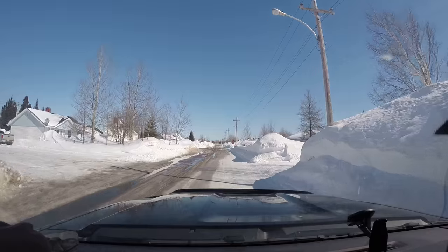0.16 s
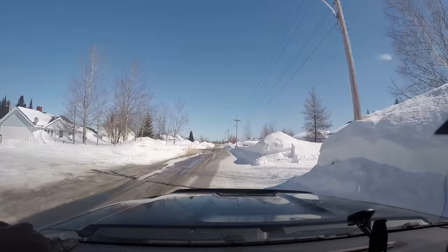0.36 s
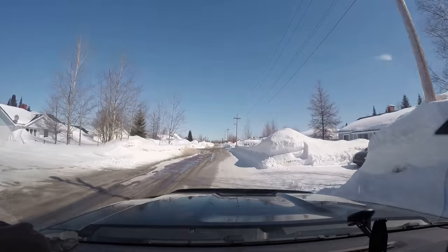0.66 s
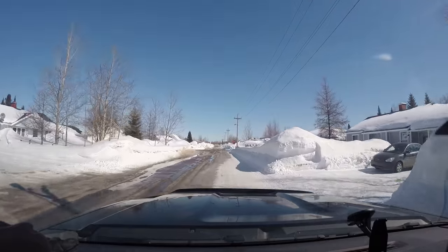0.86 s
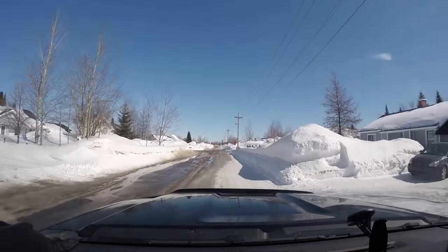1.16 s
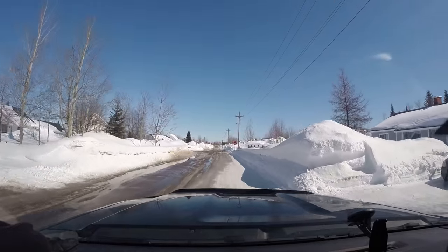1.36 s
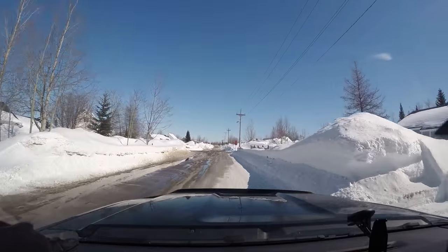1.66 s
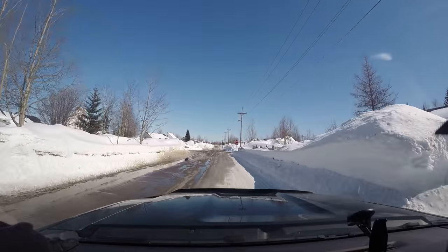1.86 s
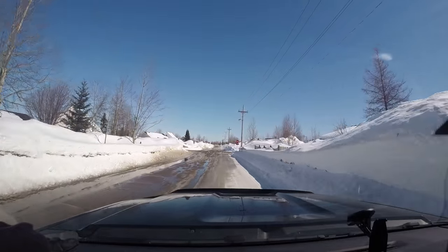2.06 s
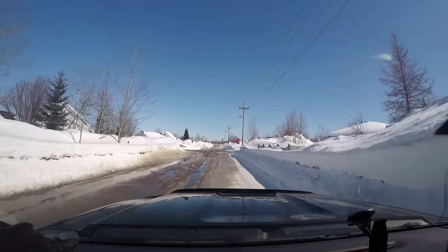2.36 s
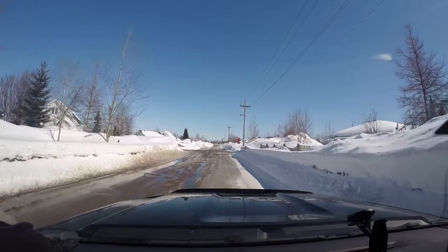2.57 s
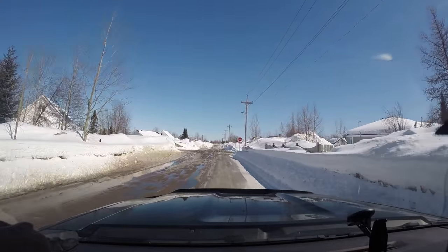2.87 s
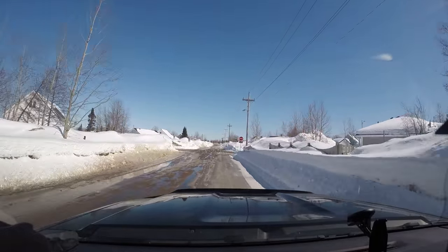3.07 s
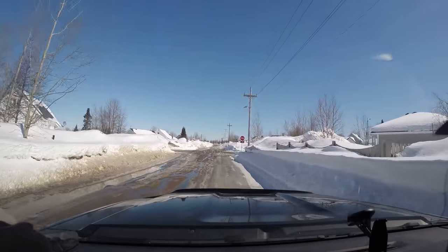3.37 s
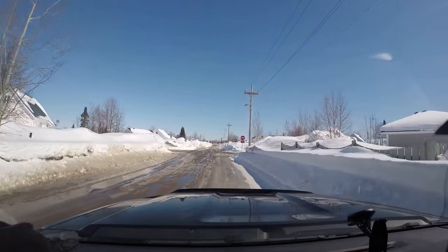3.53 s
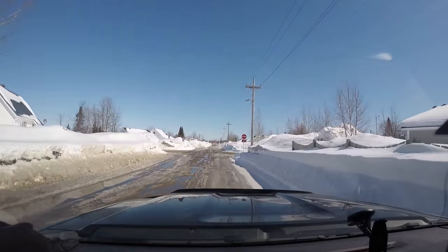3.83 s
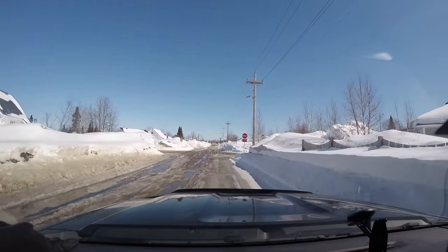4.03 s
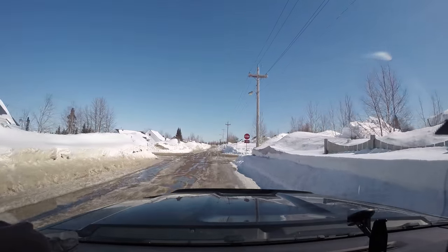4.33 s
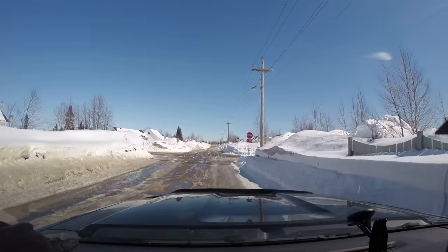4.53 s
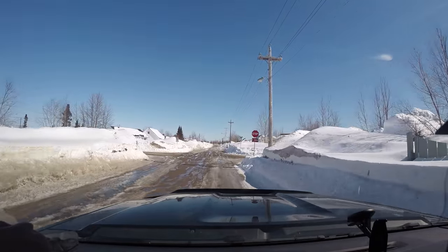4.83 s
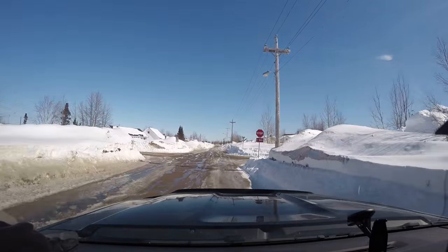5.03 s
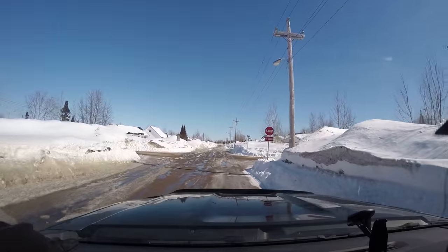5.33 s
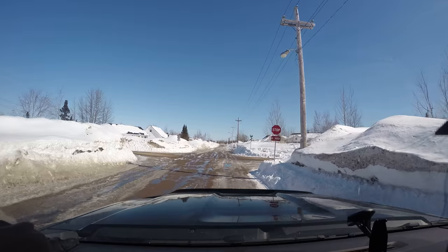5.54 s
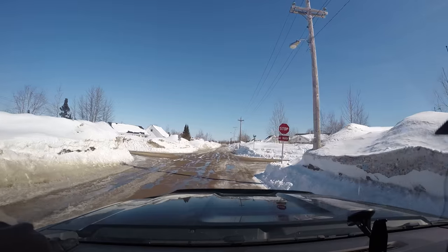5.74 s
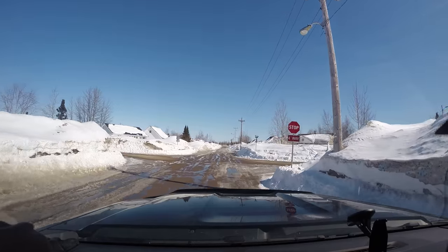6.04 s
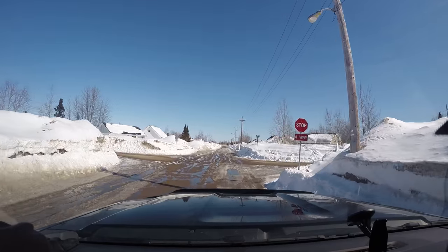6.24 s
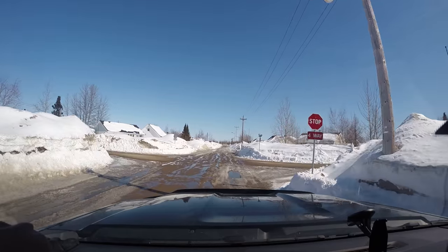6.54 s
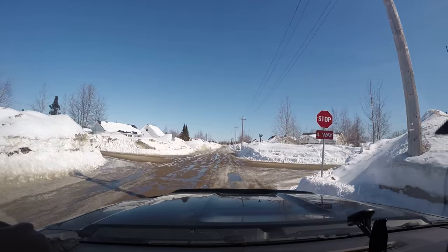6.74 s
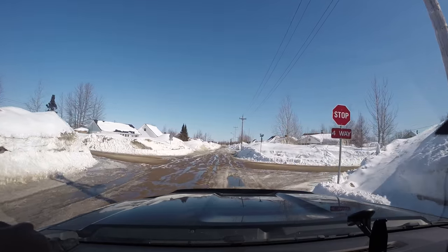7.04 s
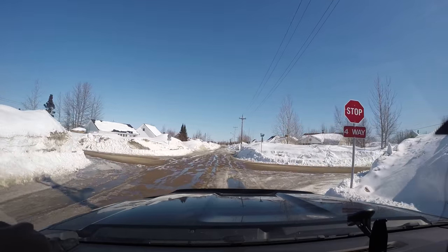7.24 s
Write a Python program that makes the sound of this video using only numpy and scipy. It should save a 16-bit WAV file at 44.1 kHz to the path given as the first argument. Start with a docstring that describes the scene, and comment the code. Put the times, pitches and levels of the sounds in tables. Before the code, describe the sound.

Inside a car rolling over a rutted, slushy road: deep uneven cabin boom and low rumble, faint braking rub, two late knocks, then quieter.

```python
"""Inside a car on a rutted, slushy road, braking to a stop sign, heard at one cabin microphone.
The cabin booms at its lowest air mode; coloured noise makes the body shake, tyre drone and hiss.
A wandering tone hums in the floor pan and resonant noise makes a faint rubbing hiss.
Trim ticks are short sine bursts; a loose part and the floor pan ring as struck decaying modes.
Short rough bursts, slush in the wheel arch and later the part's chatter, are filtered random grains."""
import sys
import numpy as np
from scipy import signal
from scipy.fft import rfft, irfft, next_fast_len
from scipy.io import wavfile
from scipy.ndimage import uniform_filter1d, map_coordinates

SR = 44100
rng = np.random.default_rng(int(sys.argv[2]) if len(sys.argv) > 2 else 0)


def to_wav(sig):
    """Store sig (one row per channel, or 1-D mono) as 16-bit WAV at the path in sys.argv[1].

    Samples outside -1..1 are clipped; the rate is SR.
    """
    pcm = np.clip(np.atleast_2d(sig), -1, 1) * 32767
    pcm = np.round(pcm).astype(np.int16)
    wavfile.write(sys.argv[1], SR, pcm.T)  # frames by channels


N = 326340  # length in samples


def amp(db):
    """Decibels to gain."""
    return 10 ** (np.asarray(db) / 20)


def unit(x):
    """Scale to rms 1."""
    return x / np.sqrt(np.mean(x ** 2) + 1e-20)


def curves(rows):
    """One value per sample for each column after the time."""
    times, *columns = np.transpose(rows)
    return [np.interp(np.arange(N) / SR, times, column) for column in columns]


def wobble(rate):
    """A smooth random curve through normal knots, rate knots a second."""
    knots = rng.standard_normal(int(N * rate / SR) + 4)
    return map_coordinates(knots, [np.arange(N) * rate / SR])


def filtered(x, response):
    """Multiply the spectrum of x by a response of frequency."""
    padded = next_fast_len(N + SR // 2)
    spectrum = rfft(x, padded) * response(np.fft.rfftfreq(padded, 1 / SR))
    return irfft(spectrum, padded)[..., :N]


def noise(spectrum):
    """Noise of rms 1 coloured by (f/Hz, level/dB) points on a log frequency axis."""
    f, db = np.transpose(spectrum)

    def colour(hz):
        return amp(np.interp(np.log(hz + 1), np.log(f + 1), db, -120, -120))

    return unit(filtered(rng.standard_normal(N), colour))


def resonances(table, f):
    """Summed response of (f/Hz, width/Hz, level/dB) resonances, alternating in sign."""
    total = 0
    for k, (centre, width, db) in enumerate(table):
        damping = 1j * f * width
        total = total + (-1) ** k * amp(db) * damping / (centre * centre - f * f + damping)
    return total


def tone(hz, db, flutter_db, flutter_rate, drift, drift_rate):
    """A sustained resonance: its level swells and dips, and its phase wanders by drift radians."""
    phase = 2 * np.pi * np.cumsum(hz) / SR + drift * wobble(drift_rate)
    flutter = unit(amp(flutter_db * wobble(flutter_rate)))
    swell = uniform_filter1d(amp(db) * flutter, size=SR // 40)  # smoothed over 25 ms
    return np.sqrt(2) * swell * np.sin(phase)


def ring(modes, tilt_db, attack, scatter_db, lasting=1):
    """Modes struck once; tilt in dB per octave, pivoting on the strongest, favours treble or bass."""
    hz, db, t60 = np.transpose(modes)[:, :, None]
    t = np.arange(SR // 3) / SR
    octaves = np.log2(hz / hz[np.argmax(db)])
    strength = amp(db + tilt_db * octaves + scatter_db * rng.standard_normal(hz.shape))
    decay = amp(-60 * t / (lasting * t60))
    return np.sum(strength * decay * np.sin(2 * np.pi * hz * t), axis=0) * (1 - np.exp(-t / attack))


def add(track, s, sound):
    """Mix a sound into the track at s seconds."""
    start = round(s * SR)
    track[start:][:len(sound)] += sound[:N - start]


def hiss():
    """Air, wet tread and microphone hiss: an even noise bed that breathes a little."""
    # spectrum: f/Hz, relative level per Hz/dB
    hiss_spectrum = [(140, -31), (230, 3.5), (242, -6), (289, -3.5), (333, -9), (640, -12.5), (848, -16),
                     (1660, -19), (2050, -21), (2490, -22), (3480, -25), (9670, -35), (15600, -49)]
    level_db = -56 + 0.23 * wobble(2.7) + 0.58 * wobble(19)
    return amp(level_db) * noise(hiss_spectrum)


def rubbing():
    """A rubbing hiss, under braking probably the pads: randomly fluttering noise through resonances."""
    # level of the rubbing hiss, strongest under braking: t/s, rms level/dB
    rub_level = [(0, -80.5), (1.1, -75.5), (1.6, -69), (2.2, -68), (2.6, -80.5), (3.3, -75), (3.8, -69),
                 (4.2, -60), (4.5, -61.5), (4.75, -58.5), (5.0, -61), (5.4, -63), (5.8, -62.5),
                 (6.2, -66.5), (6.6, -68), (7, -75), (7.4, -71)]
    # disc resonances: f/Hz, width/Hz, level/dB
    disc_modes = [(850, 1000, -6.5), (1241, 180, 1), (1722, 170, -2.5), (2136.3, 72, 2), (2472, 200, -0.5)]

    def disc(f):
        return resonances(disc_modes, f) / (1 + (f / 2900) ** 12)  # dull above 2.9 kHz

    fluttering = rng.standard_normal(N) * amp(1.2 * wobble(25))
    return amp(curves(rub_level)[0]) * unit(filtered(fluttering, disc))


def ticks():
    """Trim slips for about two cycles, answered weakly by the windscreen and dash."""
    # trim ticks: t/s, level/dB, f/Hz
    trim_slips = [(0.0398, -38.5, 1280), (1.06, -24.5, 1513), (1.0708, -40, 1420), (4.44, -36.5, 1396),
                  (4.925, -41.5, 1475), (5.09, -41.5, 1380), (6.155, -37, 1345)]
    track, t = np.zeros(N), np.arange(SR // 50) / SR
    for s, db, hz in trim_slips:
        slip = np.exp(-((t - .0012) / 0.000527) ** 2) * np.sin(2 * np.pi * hz * t)
        reflections = rng.standard_normal(len(t)) * amp(-60 * t / 0.01)
        answer = signal.fftconvolve(slip, reflections)[:len(t)]
        add(track, s, amp(db) * slip)
        add(track, s + 0.0024, amp(db - 28.5) * unit(answer))
    return track


def rough_bursts():
    """Short rough bursts of random grains: slush in the wheel arch, later the loose part's chatter."""
    # bursts: t/s, level before the envelope/dB, length/s, centre f/Hz, width/octaves
    bursts = [(3.0125, -60.5, 0.007, 3550, 0.043), (4.531, -55.5, 0.0164, 4480, 0.34),
              (4.5337, -48, 0.014, 1888, 0.46), (4.538, -53.5, 0.0297, 3800, 0.49),
              (4.559, -64.5, 0.039, 3500, 0.97), (4.544, -53.5, 0.0242, 2750, 0.197),
              (4.547, -58.5, 0.018, 5900, .25), (5.688, -60, 0.019, 3000, 0.93),
              (5.729, -64, 0.033, 3000, 0.77), (5.767, -65, 0.0225, 4000, .8),
              (5.81, -67.5, 0.033, 5000, 0.66), (5.859, -70, 0.075, 4500, 0.67)]
    # wheel arch resonances, colouring every burst: f/Hz, width/Hz, level/dB
    arch_modes = [(1190, 200, 5), (1864, 240, 2), (2586, 320, 3.5), (3366, 290, -1.5), (3690, 141, -3),
                  (4234, 167, 2), (5000, 206, -3.5), (5670, 197, -0.5), (6370, 290, -3), (7200, 330, -5.5)]
    grains_per_s, grain_spread_db = 2500, 3.5
    fine_db = -10  # fine noise between the separate grains
    track, size = np.zeros(N), 4096
    f = np.fft.rfftfreq(size, 1 / SR) + 1  # offset keeps the logarithm finite
    for s, db, length, hz, octaves in bursts:
        u = np.arange(size) / (length * SR)  # time in burst lengths
        noise_samples = rng.standard_normal(size)
        hits = rng.random(size) < grains_per_s / SR
        grain_size = amp(grain_spread_db * rng.standard_normal(size))
        grains = noise_samples * (hits * grain_size + amp(fine_db))
        band = np.exp(-.5 * (np.log2(f / hz) / octaves) ** 2)
        coloured = unit(irfft(rfft(grains) * resonances(arch_modes, f) * band))
        envelope = (1 - np.exp(-u / 0.028)) * np.exp(-u ** 4.9)
        add(track, s, amp(db) * envelope * coloured)
    return track


def clink(hz, t60):
    """An edge of the loose part rings at one pitch, together with a broad noisy snap."""
    snap_db, snap_t60 = -10, 0.0055  # starting rms level, decay in s
    t = np.arange(SR // 20) / SR
    bright = uniform_filter1d(np.diff(rng.standard_normal(len(t) + 1)), size=4)
    snap = amp(snap_db - 60 * t / snap_t60) * unit(bright)
    ringing = amp(-60 * t / t60) * (1 - np.exp(-t / 0.00052)) * np.sin(2 * np.pi * hz * t)
    return ringing + snap


def knocks():
    """The loose part knocks and bounces; low contrast rings its modes more evenly, and edges clink."""
    # blows: t/s, gain/dB, tilt/dB per octave, ringing share (scales t60), mode contrast (scales dB)
    part_blows = [(5.7307, -27, 0, 0.925, 0.96), (5.7346, -38, 6.5, 1.03, 1), (5.771, -44.5, 5, 0.76, 0.15),
                  (5.776, -45, -2.5, 0.53, 0.28), (5.805, -56.5, 14, 0.45, 0.01),
                  (5.839, -52.5, 8, 0.75, 0.13), (5.884, -56.5, 9, 0.42, 0.14)]
    # modes of the part, before those scalings: f/Hz, level/dB, t60/s
    part_modes = [(302.15, -13, 0.24), (489.7, -11, 0.0644), (612, -10.5, 0.047), (767, -21.5, 0.07),
                  (1146, -6.5, 0.049), (1197, 5, 0.0526), (1349, -2.5, 0.0605), (1453, 3.5, 0.036),
                  (1631, -4, 0.04), (1690, 7, 0.0607), (1865, -8, 0.05), (2136, -17.5, 0.065),
                  (2466, -13.5, 0.054), (2675, -9, 0.052), (2808, -14.5, 0.0433)]
    # bright clinks: t/s, level/dB, f/Hz, t60/s
    edge_clinks = [(5.692, -57.5, 3300, .02), (5.695, -58.5, 5740, 0.042), (5.700, -62, 6870, .02),
                   (5.7309, -56, 6170, 0.017), (5.732, -56, 5450, 0.0284), (5.7708, -49, 3750, 0.0129),
                   (5.7713, -57, 6200, 0.024), (5.774, -56.5, 4360, .03), (5.805, -53.5, 4544, 0.033),
                   (5.806, -58, 6100, 0.037), (5.8056, -53.5, 5200, .015), (5.821, -58, 6040, 0.028),
                   (5.839, -57.5, 4100, .015), (5.918, -53, 3385, 0.021)]
    chatter, chatter_rate = 0.21, 500  # loose seating roughens the sound: depth, knots a second
    track = np.zeros(N)
    for s, db, tilt_db, lasting, contrast in part_blows:
        modes = np.multiply(part_modes, [1, contrast, 1])
        add(track, s, amp(db) * ring(modes, tilt_db, .0027, 1, lasting))
    for s, db, hz, t60 in edge_clinks:
        add(track, s, amp(db) * clink(hz, t60))
    return track * (1 + chatter * wobble(chatter_rate)) / np.sqrt(1 + chatter ** 2)


def pan_rings():
    """Ruts, and softer surges of the hum, ring the floor pan with a softened attack."""
    # ruts and surges: t/s, gain/dB, tilt/dB per octave, ringing share (scales t60)
    pan_events = [(0.487, -31, -9, 0.55), (0.76, -31.5, -10, 0.62), (1.138, -28.5, -9, 0.58),
                  (2.39, -35, -9.5, 0.55), (2.99, -33.5, -7.5, 0.92), (4.5369, -27.5, 10.5, 0.62),
                  (4.551, -22, -3.5, 0.605), (5.729, -29.5, 12.5, 0.531), (5.785, -35.5, 2.5, 0.43),
                  (6.33, -41.5, -5, 1), (6.865, -44, -13, 0.68)]
    # floor pan modes, before tilt and share: f/Hz, level/dB, t60/s
    pan_modes = [(109, -7.5, 0.2), (136.37, 6, 0.321), (174, 0.5, 0.083), (201.7, 1.5, 0.14),
                 (246.3, -10.5, 0.15), (277.1, -16.5, 0.13), (357, -15.5, 0.12), (432.8, -28, 0.11)]
    track = np.zeros(N)
    for s, db, tilt_db, lasting in pan_events:
        add(track, s, amp(db) * ring(pan_modes, tilt_db, 0.0087, 0.94, lasting))
    return track


def pan_hum():
    """The floor pan hums under the tread near its strongest mode, wandering in pitch."""
    # hum before its flutter: t/s, level/dB
    hum_level = [(0.0, -42), (0.1, -42), (0.18, -54.5), (0.22, -43.5), (0.37, -39.5), (0.45, -42.5),
                 (0.52, -37.5), (0.56, -46), (0.74, -43), (0.8, -38.5), (1.03, -46), (1.2, -43.5),
                 (1.28, -36.5), (1.38, -47), (1.48, -42.5), (1.63, -45.5), (1.75, -40.5), (1.85, -48.5),
                 (2.08, -42.5), (2.12, -49.5), (2.18, -40), (2.23, -52), (2.43, -37.5), (2.49, -54.5),
                 (2.55, -40), (2.72, -56.5), (2.78, -40.5), (2.9, -37.5), (2.96, -43.5), (3.05, -38.5),
                 (3.15, -48), (3.5, -52.5), (3.9, -45), (4.15, -54), (4.39, -45.5), (4.43, -58),
                 (4.68, -52), (4.93, -40.5), (5.19, -46.5), (5.44, -38), (5.5, -46.5), (5.69, -53),
                 (5.85, -41.5), (5.98, -50.5), (6.39, -43.5), (6.43, -58), (6.49, -37), (6.59, -55.5),
                 (6.96, -44), (7.01, -51), (7.4, -51)]
    hz = 133 + 2.6 * wobble(6)
    return tone(hz, curves(hum_level)[0], flutter_db=0.47, flutter_rate=14, drift=0.49, drift_rate=17)


def road():
    """The road comes through as two lumpy noises: low body shake, and tyre drone through the floor."""
    # road: t/s, shake level/dB, tyre drone level/dB
    road_levels = [(0, -29.5, -40), (.5, -23, -37), (.8, -26.5, -36.5), (1.15, -21, -39.5),
                   (1.7, -27.5, -37.5), (2.25, -22, -37), (2.6, -30.5, -36.5), (3.1, -22, -40),
                   (3.67, -33.5, -39.5), (3.95, -23.5, -42), (4.65, -33, -39), (5.0, -24.5, -39),
                   (5.7, -30.5, -40.5), (6.02, -37.5, -40.5), (6.16, -24.5, -41), (6.68, -39.5, -44.5),
                   (7.1, -33, -42.5), (7.4, -33, -43.5)]
    # body shake spectrum: f/Hz, relative level per Hz/dB
    shake_spectrum = [(5, -40), (10, -12), (22, -8), (29, -2), (33, 0), (37, -6), (43, -14), (51, -10),
                      (58, -22), (75, -32), (100, -60)]
    # floor pan drone spectrum: f/Hz, relative level per Hz/dB
    drone_spectrum = [(40, -33), (58, -5.5), (69, -3.5), (80, -9.5), (97, -8), (108, -3.5), (118, -8),
                      (133, -10.5), (145, -8), (160, -10), (178, -18.5), (197, -18.5), (240, -34),
                      (420, -40.5)]
    shake_db, drone_db = curves(road_levels)
    shake_lumps = amp(1.2 * wobble(19))
    drone_lumps = amp(1.3 * wobble(4) + 1.5 * wobble(13))
    shake = amp(shake_db) * unit(shake_lumps * noise(shake_spectrum))
    drone = amp(drone_db) * unit(drone_lumps * noise(drone_spectrum))
    return shake + drone


def boom():
    """The cabin's lowest air mode sounds as a deep tone, uneven in phase and strength."""
    # cabin boom pitch before the phase wander: t/s, f/Hz
    boom_pitch = [(0, 42.88), (1.0, 43.37), (1.3, 44.7), (1.8, 43.06), (2.5, 41.61), (2.9, 43.74),
                  (3.45, 41.47), (3.8, 43.79), (5.6, 43.16), (5.87, 40.97), (6.0, 46.17), (6.3, 44.08),
                  (6.9, 43.89), (7.4, 44.58)]
    # cabin boom before its flutter: t/s, level/dB
    boom_level = [(0.0, -19), (0.25, -14), (0.29, -17.5), (0.33, -25), (0.62, -15), (0.76, -18),
                  (0.82, -27.5), (0.99, -11), (1.03, -11), (1.11, -21), (1.17, -16), (1.23, -31.5),
                  (1.32, -16.5), (1.59, -24), (1.65, -15), (2.0, -21.5), (2.06, -32), (2.12, -16.5),
                  (2.29, -15.5), (2.37, -34.5), (2.41, -18.5), (2.49, -24), (2.53, -30.5), (2.74, -20),
                  (2.92, -39), (2.99, -18.5), (3.28, -21), (3.4, -32), (3.44, -47.5), (3.5, -24.5),
                  (3.65, -27), (3.71, -40), (3.79, -24), (3.87, -30), (3.94, -20.5), (4.04, -29),
                  (4.55, -23.5), (4.59, -38.5), (4.68, -21.5), (4.74, -28.5), (4.82, -19), (5.21, -26),
                  (5.34, -14), (5.52, -25.5), (5.61, -19), (5.67, -30.5), (5.85, -23), (5.98, -39),
                  (6.1, -24), (6.33, -20), (6.66, -28), (6.74, -21), (6.78, -21.5), (6.84, -53.5),
                  (6.9, -26), (7.28, -23.5), (7.32, -35.5), (7.4, -22.5)]
    hz, db = curves(boom_pitch)[0], curves(boom_level)[0]
    return tone(hz, db, flutter_db=0.5, flutter_rate=7.1, drift=0.716, drift_rate=11)


def scene():
    """Every source adds up at one microphone in the cabin."""
    background = hiss() + rubbing() + ticks()
    short_events = rough_bursts() + knocks() + pan_rings()
    rolling = pan_hum() + road() + boom()
    return (background + short_events + rolling)[None]


def record(dry):
    """The microphone channel keeps nothing from its band limit upwards."""
    top_hz = 15700
    return filtered(dry, lambda hz: hz < top_hz)


dry = scene()
out = record(dry)
to_wav(out)
```